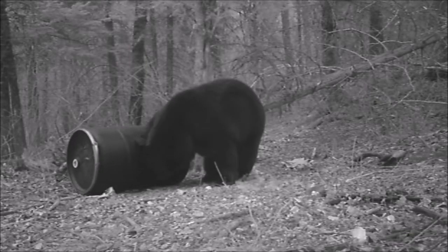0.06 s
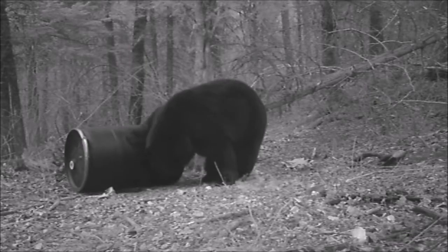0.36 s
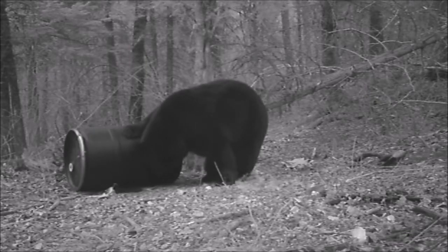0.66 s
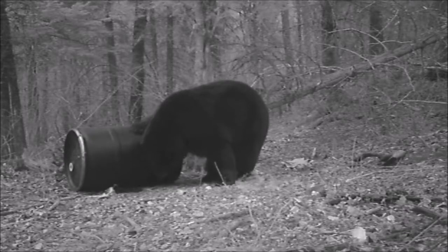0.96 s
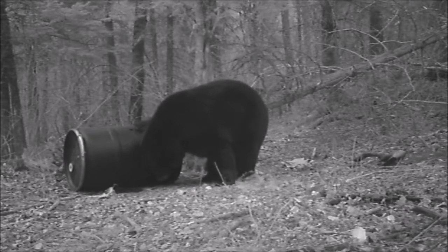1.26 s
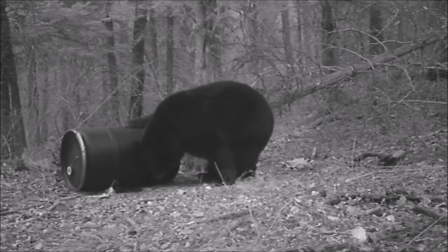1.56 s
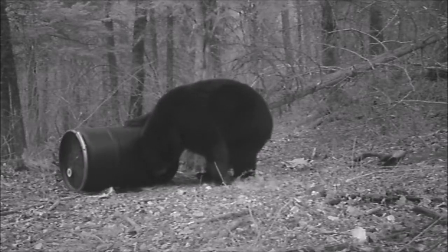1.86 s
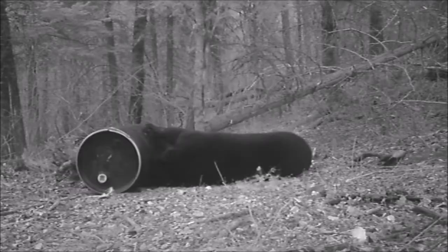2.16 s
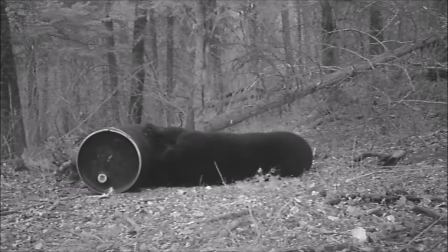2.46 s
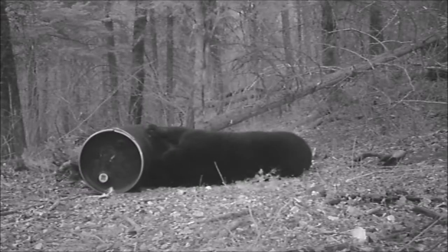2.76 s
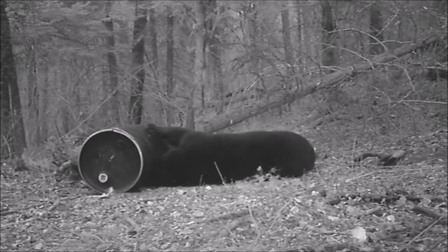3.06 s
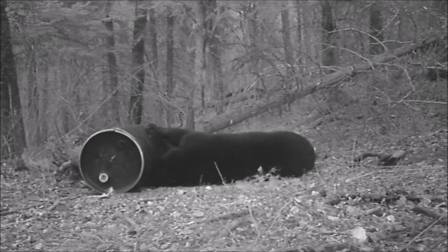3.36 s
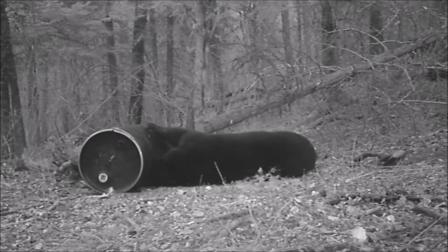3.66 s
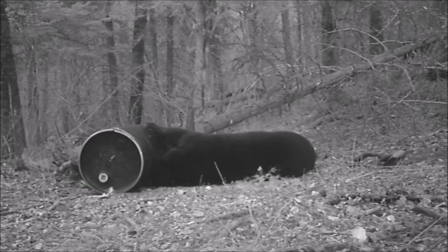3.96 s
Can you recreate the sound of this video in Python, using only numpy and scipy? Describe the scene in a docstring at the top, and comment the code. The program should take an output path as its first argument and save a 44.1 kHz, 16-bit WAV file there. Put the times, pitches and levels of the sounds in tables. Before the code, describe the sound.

A hollow barrel knocks twice at about 0.2 seconds, thumps at 0.55, and takes light nudges around 1.2, with faint leaf crunches. Muffled electronic hiss and a thin whine run throughout, with soft low blips in the first two seconds. At 2.1 the sound drops out for an instant and returns with a sharp, loud click. A low electrical flutter follows until 3.2, leaving hiss until 4.

```python
"""A hollow barrel, nosed by a bear at night, rings in its damped modes: two small knocks on the rim, then a
thump and light nudges on the wall, with leaves crunching beneath. A trail camera's narrow-band electronics add
hiss, a thin whine and soft low blips; a faint drone fades early. The sound drops out for an instant and returns
with a click, a step in the offset, after which the camera's supply flutters in steps for about a second."""
import sys
import numpy as np
from scipy import signal
from scipy.fft import rfft, irfft
from scipy.io import wavfile
from scipy.ndimage import minimum_filter1d

SR = 44100
rng = np.random.default_rng(int(sys.argv[2]) if len(sys.argv) > 2 else 0)


def int16_out(signal):
    """Quantize to a 16-bit WAV file."""
    q = np.round(np.clip(np.atleast_2d(signal).T, -1, 1) * 32767)
    wavfile.write(sys.argv[1], SR, q.astype(np.int16))


N = 176400
T = np.arange(N) / SR

# Envelopes of the background: time_s, level_db
DRONE_LEVEL = [(0, -61.5), (.12, -62), (.3, -73.5), (.6, -69), (1, -100)]
WHINE_LEVEL = [(0, -69.5), (.4, -67.5), (.8, -70.5), (1.02, -74), (1.2, -73), (1.5, -69.5), (2.5, -69.5),
               (3.4, -70), (4, -72)]
HISS_LEVEL = [(0, -60), (.08, -61.5), (.19, -55.5), (.4, -61.5), (.52, -59), (.64, -58.5), (.9, -63),
              (1.15, -59), (1.26, -61), (1.35, -58.5), (1.5, -57.5), (1.95, -57), (2.09, -58), (2.15, -61),
              (2.9, -61.5), (3.1, -62.5), (3.28, -58), (3.48, -63.5), (3.65, -61), (3.95, -62.5)]
JITTER_LEVEL = [(0, -56), (.35, -57.5), (.8, -60), (1.05, -67), (1.19, -61), (1.4, -63.5), (2.1, -59),
                (3.25, -59.5), (3.6, -57), (4, -64)]
# Spectrum of the hiss: frequency_hz, relative_density_db
HISS_SPECTRUM = [(30, 7), (120, 6.5), (300, 4), (600, 1), (1200, 1), (2200, 0.5), (3200, 0), (3800, 0),
                 (4050, -17.5)]
# Height of one stair of the supply flutter: time_s, level_db
STAIR_HEIGHT = [(2.13, -43.5), (2.55, -46.5), (2.9, -48), (3.1, -48), (3.2, -47)]
# Electrical blips: start_s, level_db, sag_length_s
BLIPS = [(0.337, -42.5, 0.014), (1.1787, -40.5, 0.0099), (1.334, -42, 0.013), (1.5306, -41, 0.015),
         (1.5725, -40, .014), (1.7396, -39.5, 0.014), (1.932, -42, 0.013), (1.981, -40, 0.015)]
# Leaves crushed under the barrel: start_s, level_db, length_s
CRUNCHES = [(0.515, -56, 0.0053), (0.634, -65, .01), (.656, -57, .022), (0.761, -64, 0.023),
            (1.324, -56, 0.026)]
# Modes of the rim and of the hollow body: pitch_hz, level_db, t60_s
RIM_MODES = [(619, -13.5, 0.08), (636, -19.5, 0.069), (1243, -13, 0.049), (1284, -19.5, 0.15),
             (1590, -18, 0.043), (1763, -6.5, 0.028), (1823, -5.5, 0.021)]
BODY_MODES = [(108.3, -5, .42), (86, -11, 0.098), (135, -8.5, 0.11), (186.6, -4, 0.18), (294, 0.5, 0.1),
              (359, -5, .09), (385, -5, 0.052)]
# Knocks on the rim: start_s, level_db, pitch_ratio
KNOCKS = [(.2136, -33.5, 0.97), (0.2429, -34, 0.94)]
# One firm thump on the wall, then light nudges: start_s, level_db, relative_push_db
THUMPS = [(0.5525, -38.5, 6), (1.151, -60.5, -4), (1.186, -55.5, 2.5), (1.3033, -54.5, 8.5)]

WHINE_HZ, GRIT_TOP_HZ, BAND_HZ, CLICK_TOP_HZ = 4000, 4000, 4090, 16300
PAUSE_S, RESUME_S = 2.091, 2.12433


def amp(db):
    """Amplitude ratio of a level in decibels."""
    return 10 ** (np.asarray(db) / 20)


def unit(x):
    """Normalisation to rms 1."""
    return x / np.sqrt(np.mean(x ** 2) + 1e-20)


def level(points):
    """Amplitude envelope, linear in decibels between (time_s, level_db) points."""
    return amp(np.interp(T, *np.transpose(points)))


def decay(t, start_db, t60_s):
    """Exponential decay: 60 dB lost every t60_s."""
    return amp(start_db - 60 * t / t60_s)


def add(mix, start_s, sound):
    """Superposition of a delayed sound on the mix."""
    part = mix[round(start_s * SR):][:len(sound)]
    part += sound[:len(part)]


def noise(gain):
    """Spectral shaping of white noise by gain(hz), at rms 1."""
    spectrum = rfft(rng.standard_normal(N)) * gain(np.fft.rfftfreq(N, 1 / SR))
    return unit(irfft(spectrum, N))


def wander(time_scale_s):
    """Low-pass noise: a random drift on the given time scale."""
    return noise(lambda hz: np.exp(-(hz * time_scale_s) ** 2))


def lowpass(x, hz):
    """Steep band limiting by convolution with a windowed sinc."""
    return signal.oaconvolve(x, signal.firwin(601, hz, window=("kaiser", 8), fs=SR), "same")


def ring(modes, t, rise_s, pitch=1):
    """Free vibration: a sum of damped sinusoids with a soft onset."""
    partials = sum(decay(t, db, t60_s) * np.sin(2 * np.pi * hz * pitch * t) for hz, db, t60_s in modes)
    return (1 - np.exp(-t / rise_s)) * partials


def pulse(t, length_s):
    """Half-sine pulse of a soft contact."""
    return np.sin(np.pi * np.clip(t / length_s, 0, 1))


def drone(centre_hz=214, width_hz=75):
    """Narrow-band noise is heard as a faint low pitch; it fades early."""
    return level(DRONE_LEVEL) * noise(lambda hz: 1 / (1 + (2 * (hz - centre_hz) / width_hz) ** 2))


def whine():
    """Random amplitude modulation makes the converter's thin tone waver."""
    waver = 1 + 0.2 * wander(0.024)
    return np.sqrt(2) * level(WHINE_LEVEL) * waver * np.sin(2 * np.pi * WHINE_HZ * T)


def hiss(flicker_db=1.69, dips_per_s=6, dip_s=0.0045, dip_db=-8.5):
    """Band-limited electronic noise, amplitude-modulated by a flicker and brief random dips."""
    knots_hz, density_db = np.transpose(HISS_SPECTRUM)
    grain = noise(lambda hz: amp(np.interp(np.log(hz + 1), np.log(knots_hz), density_db)) * (hz < BAND_HZ))
    steady = (rng.random(N) > dips_per_s / SR) * 1.
    dips = 1 - minimum_filter1d(steady, size=round(dip_s * SR))
    return grain * level(HISS_LEVEL) * amp(flicker_db * wander(0.0074) + dip_db * dips)


def jitter(steps_per_s=170, corner_hz=20):
    """A Poisson process: the zero level takes small random steps, each relaxing exponentially."""
    steps = rng.choice([-1, 1], N) * (rng.random(N) < steps_per_s / SR)
    pole = np.exp(-2 * np.pi * corner_hz / SR)
    return level(JITTER_LEVEL) * unit(signal.lfilter([1], [1, -pole], steps))


def supply_flutter(start_s=2.1144, quickens_s=2.9634, end_s=3.2035, stairs=3):
    """A stepped sawtooth wave: the supply descends and snaps back, slowly at first, then faster."""
    slow_period_s, quick_period_s = .04953, .0343
    cycles = np.where(T < quickens_s, (T - start_s) / slow_period_s, (T - quickens_s) / quick_period_s)
    staircase = (stairs - 1) / 2 - np.floor(cycles % 1 * stairs)
    return staircase * level(STAIR_HEIGHT) * (T > RESUME_S) * (T < end_s)


def blips(rebound_db=-11.5, rebound_s=0.013):
    """Electrical transients: a sharp edge, a triangular sag and a slight overshoot."""
    out, t = np.zeros(N), T[:SR // 8]
    edge = decay(t, start_db=-2, t60_s=0.019)
    for start_s, db, length_s in BLIPS:
        sag = np.interp(t / length_s, [0, .62, 1], [0, 1, 0])
        recovery = np.maximum(t - length_s, 0) / rebound_s
        rebound = amp(rebound_db) * recovery * np.exp(1 - recovery)
        add(out, start_s, amp(db) * (edge - sag + rebound))
    return out


def leaves(grit):
    """Leaves crushed under the barrel radiate short bursts of broadband noise."""
    return grit * sum(amp(db) * pulse(T - start_s, length_s) for start_s, db, length_s in CRUNCHES)


def rim_knocks(rasp_hz=2190):
    """Impacts excite the rim's high, heavily damped modes, with a short rasp of contact noise."""
    out, t = np.zeros(N), T[:SR // 2]
    contact = noise(lambda hz: 1 / (1 + (hz / rasp_hz) ** 10))[:len(t)]
    rasp = contact * decay(t, start_db=-20.5, t60_s=0.03)
    for start_s, db, pitch in KNOCKS:
        add(out, start_s, amp(db) * (rasp - ring(RIM_MODES, t, rise_s=0.0017, pitch=pitch)))
    return out


def wall_thumps(grit, push_s=0.0062, recoil_s=0.03, recoil_db=-11, scuff_rise_s=0.0018):
    """Forced, then free vibration: the scuffed wall yields and springs back, and the body rings."""
    out, t = np.zeros(N), T[:SR // 2]
    body = ring(BODY_MODES, t, rise_s=0.0021)
    push = pulse(t, push_s) - amp(recoil_db) * pulse(t - push_s, recoil_s)
    scuff = grit[:len(t)] * decay(t, start_db=-5.5, t60_s=0.064) * (1 - np.exp(-t / scuff_rise_s))
    for start_s, db, push_db in THUMPS:
        add(out, start_s, amp(db) * (scuff - body - amp(push_db) * push))
    return out


def scene():
    """Superposition of the background and the barrel, in mono."""
    grit = noise(lambda hz: hz < GRIT_TOP_HZ)
    barrel = leaves(grit) + rim_knocks() + wall_thumps(grit)
    background = drone() + whine() + hiss() + jitter() + supply_flutter() + blips()
    return (background + barrel)[None]


def record(dry, rest_db=-46, click_db=-18, settle_s=0.54, settle_share=0.73):
    """Band limiting, a brief silence, then a step response: the offset jumps with a click and partly settles."""
    rest_offset = -amp(rest_db) * (T < PAUSE_S)
    running = (T < PAUSE_S) | (T >= RESUME_S)
    narrow = lowpass(dry[0] + rest_offset, BAND_HZ) * running
    settled = settle_share * (1 - np.exp(-np.maximum(T - RESUME_S, 0) / settle_s))
    click_offset = -amp(click_db) * (T >= RESUME_S) * (1 - settled)
    padded = np.pad(narrow + click_offset, SR, mode="edge")  # keeps the ends free of clicks
    return lowpass(padded, CLICK_TOP_HZ)[None, SR:-SR]


dry = scene()
out = record(dry)
int16_out(out)
```